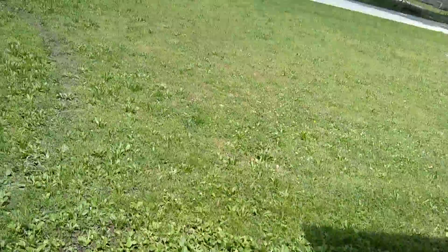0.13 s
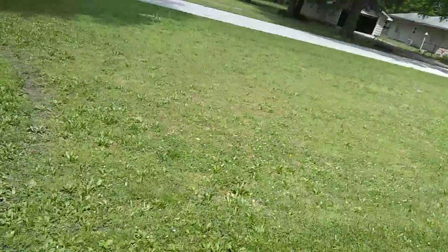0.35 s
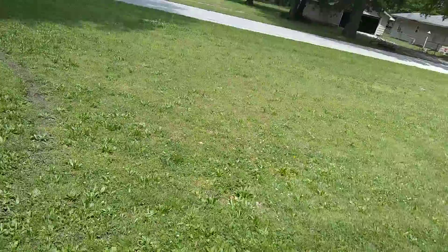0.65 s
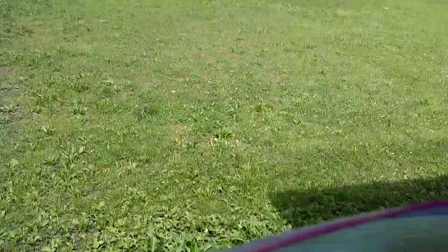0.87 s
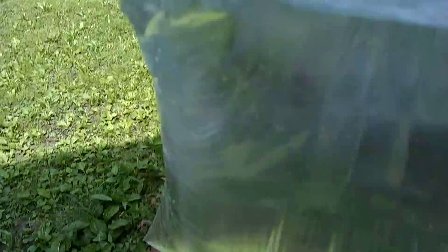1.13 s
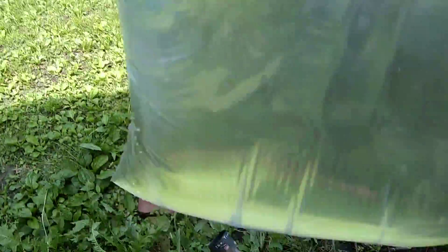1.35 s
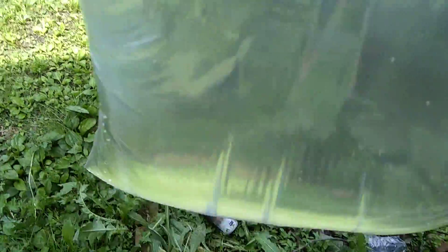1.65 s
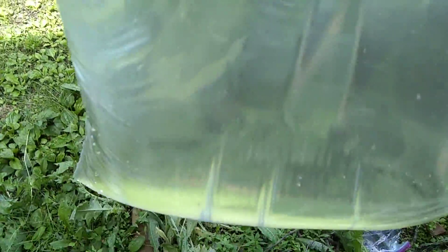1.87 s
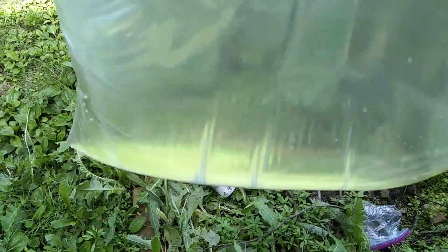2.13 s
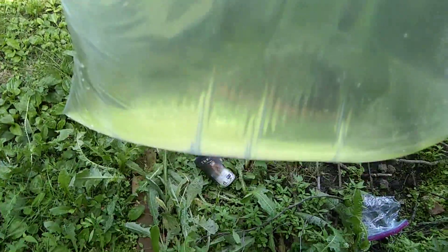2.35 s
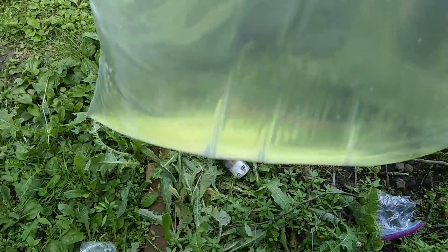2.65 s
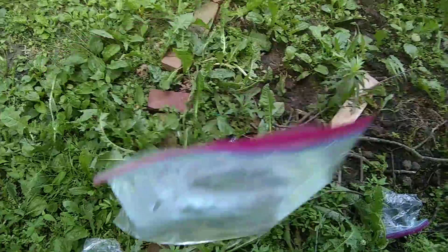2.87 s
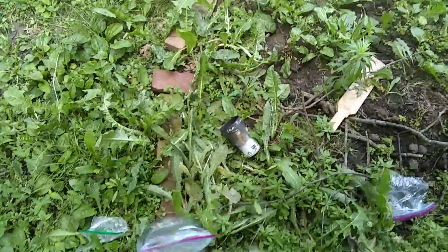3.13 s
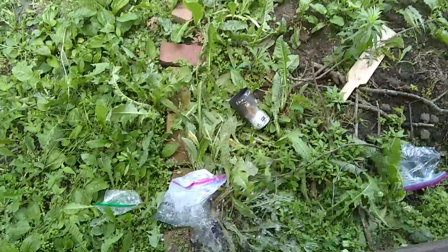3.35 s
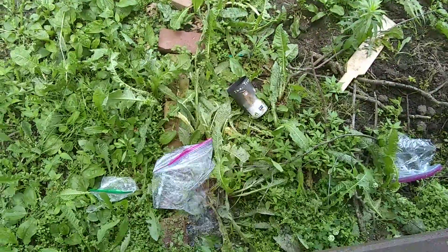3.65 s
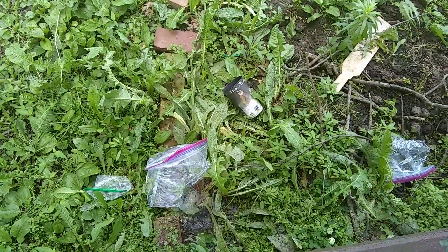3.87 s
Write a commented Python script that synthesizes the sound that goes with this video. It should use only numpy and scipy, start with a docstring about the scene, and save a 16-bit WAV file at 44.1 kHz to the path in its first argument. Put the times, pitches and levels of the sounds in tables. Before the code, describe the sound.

Close stereo microphone on a lawn: soft plastic crinkles and a few light knocks, a thumping release, half a second's pause, then a sharp wet smack, crinkling film and drops trickling away on leaves.

```python
"""Far traffic, light wind and a small bird over a lawn: filtered noise, a far engine note and gliding sines.
Close by, the film of a water-filled plastic bag rustles and ticks as showers of clicks and short noise bursts,
and a few drops tap on leaves; the bag knocks as decaying modes, then slips out of the fingers with a thump, a
slide and snaps. Half a second later it bursts on the ground: a noise crack, a gush of clicks and ringing
bubbles, then drops pattering on leaves. The recorder's gain control ducks after both blows."""
import sys
import numpy as np
from scipy import signal
from scipy.fft import rfft, irfft
from scipy.io import wavfile
from scipy.ndimage import uniform_filter1d, minimum_filter1d

SR = 44100
rng = np.random.default_rng(int(sys.argv[2]) if len(sys.argv) > 2 else 0)


def log_audio(samples):
    """Write samples as a 16-bit WAV file to the path given in sys.argv[1]."""
    # one column per channel
    frames = np.atleast_2d(samples).T
    # limit to full scale, then quantise
    limited = np.clip(frames, -1, 1)
    pcm = np.round(limited * 32767).astype(np.int16)
    wavfile.write(sys.argv[1], SR, pcm)


N = 176400
T = np.arange(N) / SR  # s
HZ = np.maximum(np.arange(N // 2 + 1) * SR / N, 1)
CREASES_PER_S = 8300


def from_db(db):
    """Decibels to gain."""
    return 10 ** (np.asarray(db) / 20)


def rms_one(x):
    """Scale to unit power."""
    return x / np.sqrt(np.mean(x ** 2) + 1e-20)


def in_time(rows):
    """Each column of a curve, interpolated at every sample."""
    s, *columns = np.transpose(rows)
    return [np.interp(T, s, column) for column in columns]


def over_hz(points):
    """A spectrum table, interpolated over log frequency."""
    hz, value = np.transpose(points)
    return np.interp(np.log(HZ), np.log(hz), value)


def drift(rate_hz):
    """Random wander, low-passed around rate_hz, rms 1."""
    spectrum = rfft(rng.standard_normal(N))
    return rms_one(irfft(spectrum / (1 + (HZ / rate_hz) ** 2), N))


def colour(pair, spectrum):
    """Shape two unrelated excitations and mix them to the left-right likeness of a widened stereo image; rms 1."""
    # left-right likeness, clipped inside -1 to 1: f/Hz, likeness
    likeness = [(25, -1.22), (60, -0.81), (150, 0.095), (350, 0.39), (700, 0.44), (1150, 0.85), (2300, 1),
                (4500, 0.89), (7000, 0.27), (14000, 0.23)]
    # microphone response: f/Hz, gain/dB
    microphone = [(1900, 0), (2250, 2), (2500, 1), (2740, 2.5), (3100, -0.5), (3500, -1), (3850, 0),
                  (4400, 1), (5200, 0.5)]
    crest_hz, swing_period_hz = 1148, 2248
    # above the crest the likeness swings in sign, giving a wide, hollow stereo image
    swing = np.cos(2 * np.pi * np.maximum(HZ - crest_hz, 0) / swing_period_hz)
    alike = np.clip(over_hz(likeness), -.99, .99) * swing
    mid, side = rfft(pair) * from_db(over_hz(spectrum) + over_hz(microphone))
    mid = irfft(mid * np.sqrt(1 + alike), N)
    side = irfft(side * np.sqrt(1 - alike), N)
    return rms_one(np.array([mid + side, mid - side]))


def noise(spectrum):
    """Smooth stereo noise, rms 1."""
    return colour(rng.standard_normal((2, N)), spectrum)


def clicks(per_s, spread_db):
    """Randomly timed clicks; an exponential draw, capped, sets each gain in dB."""
    gain_db = spread_db * np.minimum(rng.exponential(1, N), np.pi)
    return (rng.random(N) < per_s / SR) * from_db(gain_db)


def crackle(spectrum, per_s, spread_db):
    """A dense stereo shower of tiny snaps, rms 1."""
    return colour(clicks(per_s, spread_db) * rng.standard_normal((2, N)), spectrum)


def envelope(start_s, attack_s, t60_s, hold_s=0):
    """Straight rise, hold, exponential fall."""
    falling_s = np.maximum(T - start_s - attack_s - hold_s, 0)
    return np.clip((T - start_s) / attack_s, 0, 1) * np.exp(-np.log(1000) * falling_s / t60_s)


def sine(hz):
    """A tone of rms 1 following a pitch curve."""
    return np.sqrt(2) * np.sin(2 * np.pi * np.cumsum(hz) / SR)


def wall(x):
    """A nearby house wall returns one short echo."""
    echo_lag_s, echo_db = .0061, -17.5
    echo = np.array([np.interp(T - echo_lag_s, T, side) for side in x])
    return x + from_db(echo_db) * echo


def landing():
    """The bag brushes through leaves, cracks on the soil and throws out its water in surges and spray."""
    # leaf and crack spectrum: f/Hz, density/dB
    crack_spectrum = [(100, -16), (400, 2.5), (1200, -2), (2800, 2), (4500, -5.5), (7800, -4), (9700, 0.5),
                      (12000, 2), (14500, -11)]
    # surges of water out of the bag: t/s, level/dB, t60/s
    surges = [(3.174, -11, 0.2), (3.186, -11.5, 0.056), (3.2, -9, 0.044), (3.211, -18, 0.036)]
    # gush and spray spectra: f/Hz, density/dB
    gush_spectrum = [(80, -31), (300, -17), (800, -12), (1300, -5), (1800, 7), (2750, -3), (3400, -9),
                     (4500, -7), (7500, -12), (11000, -3), (14500, -21)]
    spray_spectrum = [(150, -21), (700, 6.5), (1800, -13), (3300, 3.5), (5000, -1), (7500, -5),
                      (11000, 1.5), (14500, -12)]
    brush_s, leaf_hit_s, landing_s = 3.146, 3.163, 3.1735
    brush_db, leaf_hit_db, crack_db, thud_db, spray_db = -32.5, -22, -5.5, -32, -11.5
    thud_hz, bubble_db = 215, -4  # bubbles relative to the gush crackle

    leaves = from_db(brush_db) * envelope(brush_s, 0.0038, .03, hold_s=landing_s - brush_s)
    leaves = leaves + from_db(leaf_hit_db) * envelope(leaf_hit_s, 0.0019, 0.051)
    crack = from_db(crack_db) * envelope(landing_s, 0.0011, 0.007, hold_s=0.001)
    thud = from_db(thud_db) * envelope(landing_s, .003, 0.042)
    thud = thud * np.sin(2 * np.pi * thud_hz * (T - landing_s))
    gush = sum(from_db(db) * envelope(s, 0.0036, t60_s) for s, db, t60_s in surges)
    water = crackle(gush_spectrum, per_s=2800, spread_db=1.0) + from_db(bubble_db) * bubbles()
    spray = from_db(spray_db) * envelope(landing_s, 0.008, 0.37)
    spray = spray * wall(crackle(spray_spectrum, per_s=4000, spread_db=1.5))
    return (leaves + crack) * noise(crack_spectrum) + thud + gush * water + spray


def bubbles():
    """Small air pockets, struck by random clicks, ring as decaying two-pole resonators; rms 1."""
    low_hz, high_hz, pitches = 611, 1960, 20
    bubbles_per_s, cycles_to_t60 = 900, 31
    out = 0
    for hz in np.geomspace(low_hz, high_hz, pitches):
        radius = np.exp(-np.log(1000) * hz / (cycles_to_t60 * SR))
        angle = 2 * np.pi * hz / SR
        born = clicks(bubbles_per_s / pitches, spread_db=-0.5) * rng.choice([-1, 1], N)
        poles = [1, -2 * radius * np.cos(angle), radius * radius]
        out = out + signal.lfilter([0, np.sin(angle)], poles, born + 1e-18)
    return rms_one(out)


def crinkles():
    """The emptying bag folds up in short bursts of creases."""
    # folds: t/s, level/dB, t60/s
    fold_rows = [(3.166, -21, 0.014), (3.203, -13, .015), (3.379, -24, .05), (3.411, -26, 0.043),
                 (3.432, -36, .02), (3.473, -20.5, 0.047), (3.509, -24, .02), (3.612, -36, .04)]
    # fold spectrum: f/Hz, density/dB
    fold_spectrum = [(800, -11), (1700, -4), (3500, 2), (7500, -1), (10000, 3), (14500, -13)]
    folds = sum(from_db(db) * envelope(s, 0.0016, t60_s) for s, db, t60_s in fold_rows)
    return folds * crackle(fold_spectrum, per_s=4400, spread_db=1.0)


def plinks():
    """Big drops fall into the puddle and trap bubbles that ring briefly and rise in pitch."""
    # drops: t/s, f/Hz, level/dB
    big_drops = [(3.368, 1050, -37), (3.428, 1690, -35), (3.451, 1610, -31), (3.504, 1730, -34)]
    t60_s, rise_hz_per_s = .06, 2500
    out = 0
    for s, hz, db in big_drops:
        pitch_hz = hz + rise_hz_per_s * np.clip(T - s, 0, t60_s)
        out = out + from_db(db) * envelope(s, .001, t60_s) * sine(pitch_hz)
    return out


def patter():
    """Thrown drops rain back on the leaves and trickle away: clicks, noise and bubbles under one level curve."""
    # common level: t/s, level/dB
    patter_level = [(3.22, -17), (3.29, -26.5), (3.35, -30), (3.39, -25.5), (3.48, -27.5), (3.55, -35),
                    (3.68, -38), (3.8, -44.5), (4, -47)]
    # drop spectrum: f/Hz, density/dB
    drop_spectrum = [(150, -13), (500, 6), (1000, -1.5), (1700, -5), (3300, 0), (5000, -3), (8000, -7),
                     (11000, -0.5), (14500, -11)]
    start_s, drops_per_s = 3.1735, 2500
    level_db, = in_time(patter_level)
    drops = crackle(drop_spectrum, drops_per_s, spread_db=1.5) * from_db(-4 + 1.5 * drift(60))
    runoff = noise(drop_spectrum) * from_db(-3.5) + bubbles() * from_db(-9.5)
    return (T > start_s) * from_db(level_db) * wall(drops + runoff)


def letting_go():
    """The bag knocks and wobbles while its rim slides out of the fingers, catching and snapping free."""
    # hanging water wobbles: t/s, level/dB, t60/s
    wobble_rows = [(2.653, -30, .08), (2.6645, -29.5, 0.16), (2.6908, -18.5, 0.099)]
    # rim catches and snaps free: t/s, level/dB, t60/s
    snap_rows = [(2.6901, -20.5, 0.02), (2.7024, -24, 0.016), (2.713, -27, 0.022), (2.7243, -30.5, 0.01)]
    # wobble, slip and snap spectra: f/Hz, density/dB
    wobble_spectrum = [(50, -41), (100, -16), (160, -4), (280, 2), (550, -11), (1200, -17), (4000, -37)]
    slip_spectrum = [(150, 4), (400, 7.5), (1500, -1), (3000, -1), (5500, -5.5), (11000, -5), (14500, -13)]
    snap_spectrum = [(300, -10), (1500, 2.5), (3200, 5), (5500, -6.5), (11000, -7), (14500, -17)]
    slip_s, slip_end_s, slip_db, slip_t60_s = 2.645, 2.724, -29.5, 0.064

    wobbles = sum(from_db(db) * envelope(s, 0.0017, t60_s) for s, db, t60_s in wobble_rows)
    slip = from_db(slip_db) * envelope(slip_s, slip_end_s - slip_s, slip_t60_s)
    snaps = sum(from_db(db) * envelope(s, 0.00062, t60_s, hold_s=0.00059) for s, db, t60_s in snap_rows)
    slide = slip * crackle(slip_spectrum, CREASES_PER_S, spread_db=3.5)
    return knocks() + wobbles * noise(wobble_spectrum) + slide + snaps * noise(snap_spectrum)


def knocks():
    """Each jerk or settling sets the bag's modes ringing briefly; the left side comes a little later."""
    # knocks: t/s, level/dB, brightness/(dB/decade)
    knock_rows = [(1.4122, -23.5, -9.5), (2.116, -25.5, -15), (2.6495, -17.5, 0), (2.69, -13.5, -6),
                  (2.7174, -23, -3)]
    # modes: f/Hz, level/dB, t60/s; gain and pitch scatter per knock
    modes = [(341, -8, 0.028), (565, -3, 0.015), (893, -1, 0.013), (1480, -1, .007), (2960, -4, 0.0094),
             (3530, -6, .007), (4000, -10.5, 0.0055)]
    pivot_hz, left_lag_s = 594, .00027
    out = 0
    for s, db, tilt_db in knock_rows:
        for hz, mode_db, t60_s in modes:
            tilted_db = db + mode_db + tilt_db * np.log10(hz / pivot_hz)
            gain = from_db(tilted_db + rng.standard_normal())
            ring = np.sin(2 * np.pi * hz * rng.normal(1, 0.037) * (T - s))
            out = out + gain * envelope(s, 0.00027, t60_s) * ring
    return np.array([np.interp(T - left_lag_s, T, out), out])


def handling():
    """The film crumples in showers of tiny creases; single creases snap, and a few drops tap on the leaves."""
    # crumpling: t/s, level/dB, attack/s, t60/s
    rustle_rows = [(0.092, -36.5, 0.022, 0.29), (.24, -47, 0.01, 0.24), (.3, -51, 0.011, 1),
                   (0.467, -30.5, 0.0061, 0.28), (.81, -51, 0.044, 1), (0.919, -36.5, 0.028, 0.24),
                   (2.458, -47.5, 0.0069, 0.3), (2.615, -44, 0.016, 0.18)]
    # single creases: t/s, level/dB
    tick_rows = [(.0765, -38), (0.2522, -40.5), (0.846, -32), (1.113, -30.5), (2.4568, -25.5),
                 (2.616, -38.5), (2.629, -39), (3.1458, -29)]
    # taps: t/s, level/dB
    tap_rows = [(0.111, -26.5), (.474, -37.5), (3.313, -16), (3.507, -21.5), (3.781, -24)]
    # film, tick and tap spectra: f/Hz, density/dB
    film_spectrum = [(300, -8), (1500, 2.5), (3000, -4.5), (5000, -5), (7500, -3), (11500, 4.5),
                     (14500, -7.5)]
    tick_spectrum = [(1000, -31), (3500, -4), (6500, -6.5), (9000, 5.5), (12300, 4), (14500, 1)]
    tap_spectrum = [(400, 8), (1600, -3), (2400, -9), (3700, 2.5), (4800, -33), (14000, -18)]
    tick_t60_s, tap_t60_s = 0.014, 0.01

    rustle = sum(from_db(db) * envelope(s, attack_s, t60_s) for s, db, attack_s, t60_s in rustle_rows)
    ticks = sum(from_db(db) * envelope(s, 0.00039, tick_t60_s) for s, db in tick_rows)
    taps = sum(from_db(db) * envelope(s, 0.0008, tap_t60_s) for s, db in tap_rows)
    creases = crackle(film_spectrum, CREASES_PER_S, spread_db=-0.5) * from_db(0.89 * drift(130))
    film = taps * noise(tap_spectrum) + rustle * creases + ticks * noise(tick_spectrum)
    return film * from_db(0.21 * np.array([[1], [-1]]))  # slightly louder on the left


def bird():
    """Short, fluttering whistles, gliding or arched in pitch, blurred by trees and houses."""
    # notes: t/s, length/s, start f/Hz, end f/Hz, arch f/Hz, level/dB before flutter and echo
    chirps = [(.435, 0.098, 2720, 2780, 177, -46.5), (.79, 0.12, 3330, 3330, 0, -55),
              (0.808, 0.061, 2980, 2700, 5, -51.5), (1.068, 0.08, 2680, 2750, 222, -48),
              (1.291, 0.073, 3680, 3250, 4, -52.5), (1.807, .1, 2900, 2850, 0, -56.5),
              (2.203, 0.076, 3350, 3350, 96, -52), (2.246, 0.042, 3150, 3060, 7, -47),
              (2.469, 0.059, 3250, 3450, 1, -58.5), (2.54, 0.11, 2800, 2780, 0, -63),
              (2.716, 0.056, 2750, 2740, 0, -53), (2.771, 0.0755, 3650, 3256, -1, -45),
              (2.804, .045, 3310, 2950, 0, -44.5)]
    warble_depth, flutter_db, scatter_t60_s = 0.0102, 3.5, 0.43
    direct_db, echo_db = 0, -6
    song, warble = 0, 1 + warble_depth * drift(94)
    for s, length_s, start_hz, end_hz, arch_hz, db in chirps:
        along = np.clip((T - s) / length_s, 0, 1)
        swell = np.sin(np.pi * along)
        pitch_hz = start_hz + (end_hz - start_hz) * along + arch_hz * swell
        song = song + from_db(db) * swell * sine(pitch_hz * warble)
    song = song * from_db(flutter_db * drift(64))
    scatter = rng.standard_normal((2, N)) * envelope(0, 0.0064, scatter_t60_s)
    scatter = scatter / np.sqrt(np.sum(scatter ** 2, axis=1, keepdims=True))
    echo = signal.fftconvolve(song[None], scatter, axes=1)[:, :N]
    return from_db(direct_db) * song + from_db(echo_db) * echo


def background():
    """Far traffic, wind and leaf hiss as noise, with a rising engine note and a wavering drone as sines."""
    # traffic, wind and leaf hiss: f/Hz, density/dB
    outdoor_spectrum = [(25, -3.5), (60, -1.5), (105, -2.5), (150, -4), (260, 2.5), (600, -9),
                        (1000, -11.5), (2000, -18), (3200, -22.5), (5000, -30), (11000, -35), (14500, -40)]
    # its level before wander and echo: t/s, level/dB
    outdoor_level = [(0, -35.5), (1.15, -36), (1.3, -38), (1.9, -37.5), (2.55, -39), (2.85, -37.5),
                     (3.1, -37.5), (3.5, -42), (4, -42)]
    # far engine, mean course: t/s, f/Hz, level/dB
    engine_course = [(0, 70, -52), (.55, 86, -56.5), (.95, 104, -44.5), (1.2, 110, -47.5), (1.5, 112, -50),
                     (2.3, 103, -53), (4, 112, -57.5)]
    # drone, mean values: f/Hz, level/dB
    drone_tones = [(258, -50.5), (319, -56), (385, -52), (490, -54)]
    drone_waver = 0.01637  # rms, relative to pitch

    level_db, = in_time(outdoor_level)
    engine_hz, engine_db = in_time(engine_course)
    hum = from_db(engine_db + 2.4 * drift(4.4)) * sine(engine_hz * (1 + 0.021 * drift(10.0)))
    for hz, db in drone_tones:
        tone = sine(hz * (1 + drone_waver * drift(8.33)))
        hum = hum + from_db(db + 2.87 * drift(6.9)) * tone
    return from_db(level_db + 0.93 * drift(24)) * wall(noise(outdoor_spectrum)) + hum


def wind():
    """Light puffs of wind on the microphones, low noise that dies down before the landing."""
    # wind spectrum: f/Hz, density/dB
    wind_spectrum = [(25, -8), (60, -3), (120, -11), (400, -45), (2000, -80)]
    mean_db, gust_db, end_s, fade_s = -56, 5, 2.7, .5
    fade = np.clip((end_s - T) / fade_s, 0, 1)
    return from_db(mean_db + gust_db * drift(9)) * fade * noise(wind_spectrum)


def scene():
    """Everything on the lawn."""
    low_cut_hz = 176  # keeps the blows free of rumble
    low_cut = signal.butter(2, low_cut_hz, "high", fs=SR, output="sos")
    blows = signal.sosfilt(low_cut, letting_go() + landing())
    bag = blows + crinkles() + plinks() + patter() + handling()
    return bag + bird() + background() + wind()


def record(dry):
    """Gain control ducks quickly, holds and creeps back; peaks are rounded and the top is cut."""
    threshold_db, attack_s, hold_s, release_db_per_s = -23, 0.0022, 0.23, 8.5
    window, hold = int(.01 * SR), int(hold_s * SR)
    cutoff_hz = 14400
    # the filter origins make both windows look back only
    power = uniform_filter1d(np.mean(dry ** 2, axis=0), window, origin=(window - 1) // 2)
    over_db = np.maximum(10 * np.log10(np.maximum(power, 1e-12)) - threshold_db, 0)
    held_db = -minimum_filter1d(-over_db, hold, origin=(hold - 1) // 2)
    release_db = release_db_per_s * T
    duck_db = np.maximum.accumulate(held_db + release_db) - release_db
    r = np.exp(-1 / (attack_s * SR))
    smooth_duck_db = signal.lfilter([1 - r], [1, -r], duck_db)
    rounded = np.tanh(dry * from_db(-smooth_duck_db))
    top_cut = signal.ellip(10, .2, 80, cutoff_hz, fs=SR, output="sos")
    return signal.sosfilt(top_cut, rounded)


dry = scene()
out = record(dry)
log_audio(out)
```